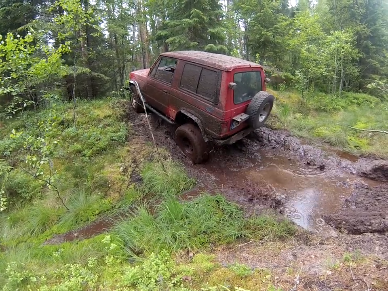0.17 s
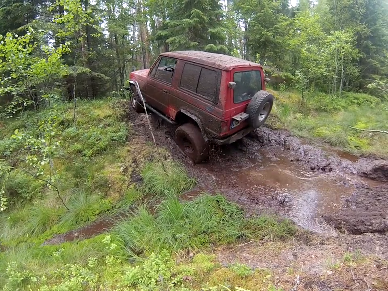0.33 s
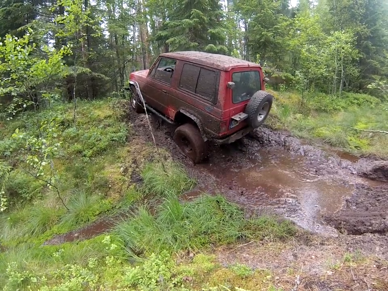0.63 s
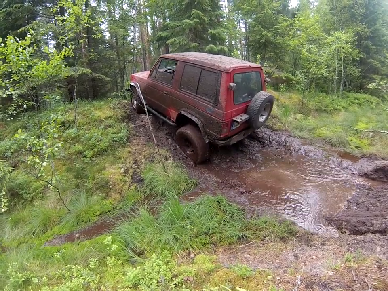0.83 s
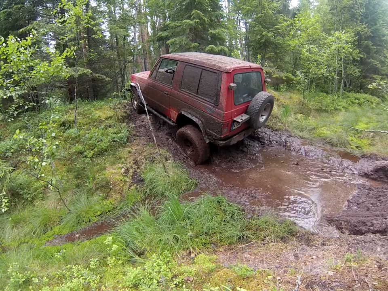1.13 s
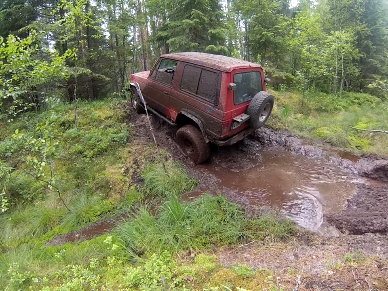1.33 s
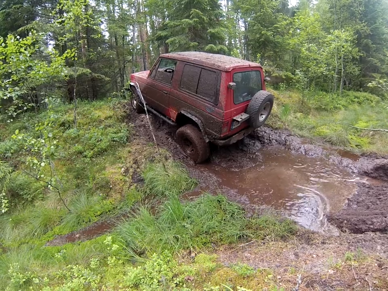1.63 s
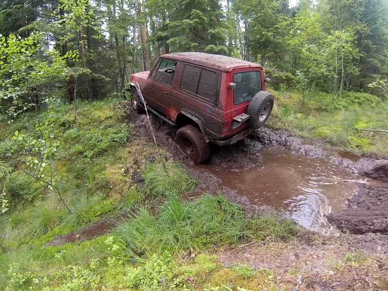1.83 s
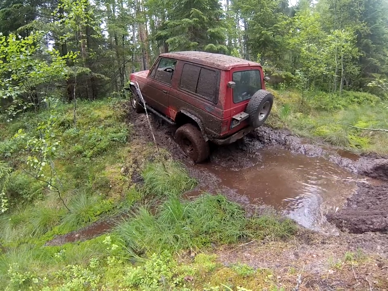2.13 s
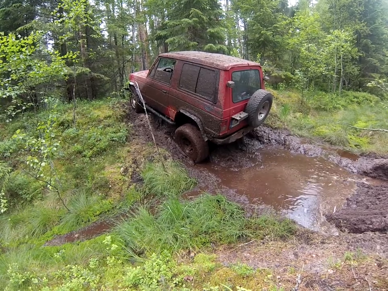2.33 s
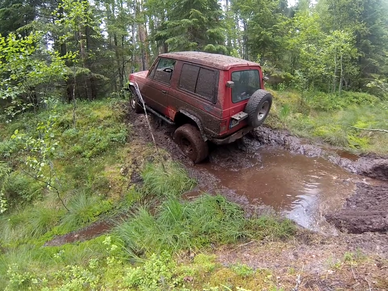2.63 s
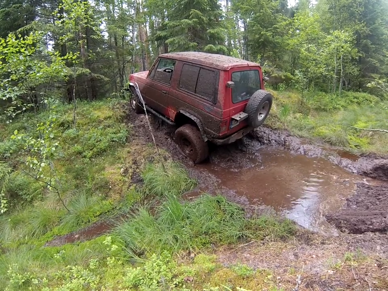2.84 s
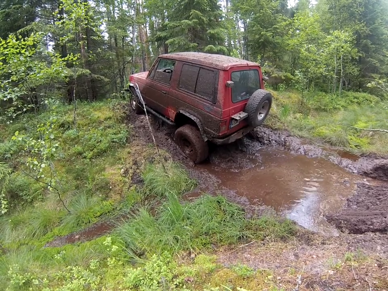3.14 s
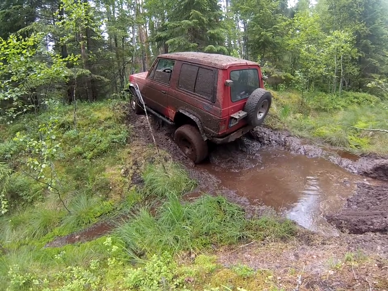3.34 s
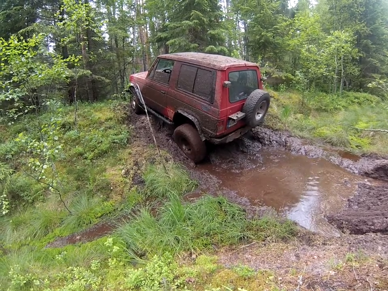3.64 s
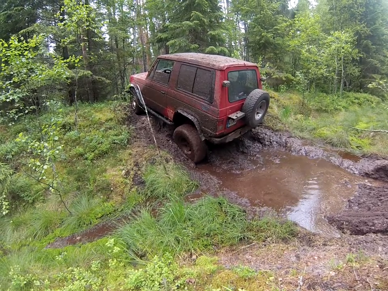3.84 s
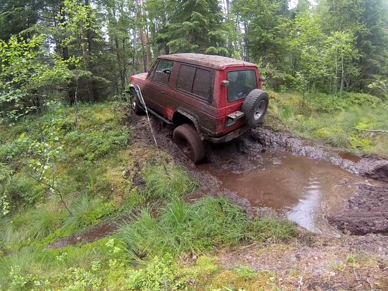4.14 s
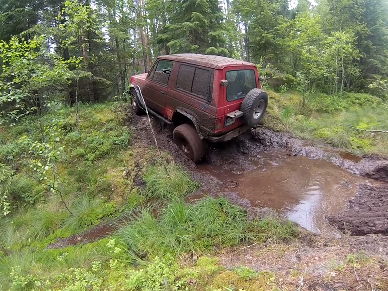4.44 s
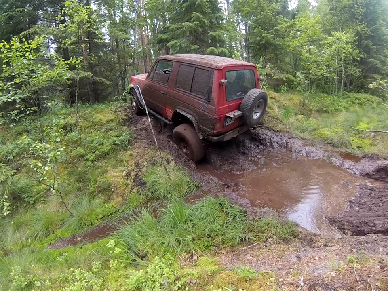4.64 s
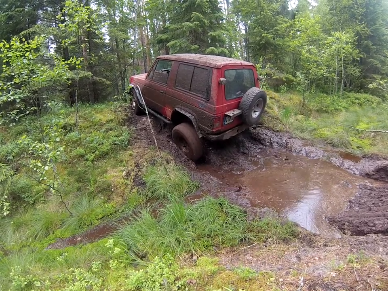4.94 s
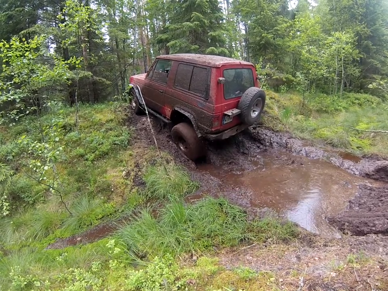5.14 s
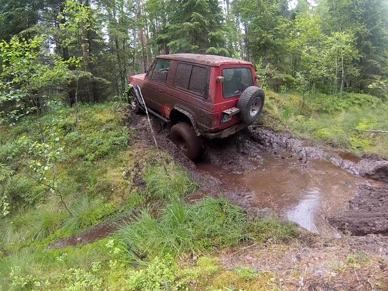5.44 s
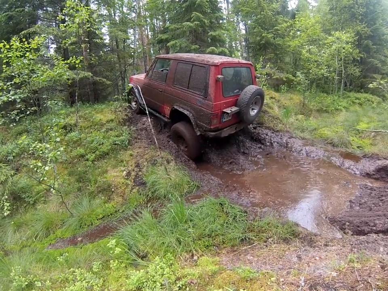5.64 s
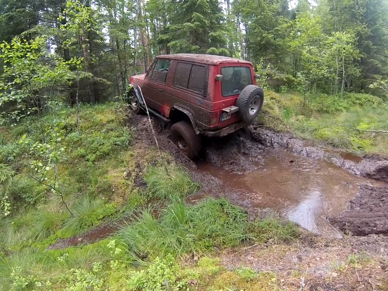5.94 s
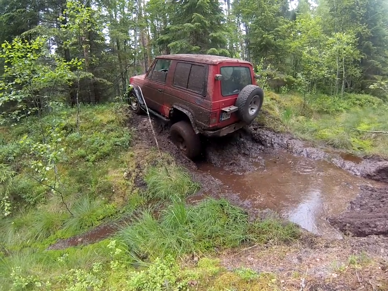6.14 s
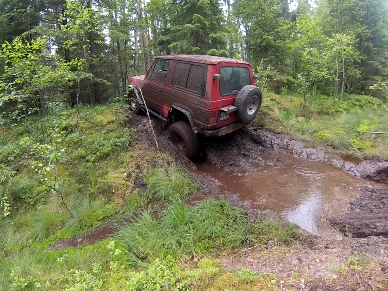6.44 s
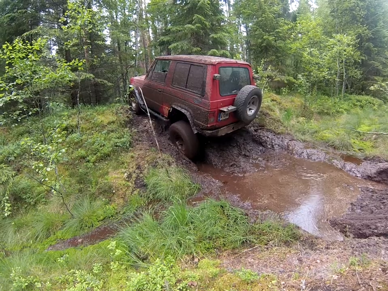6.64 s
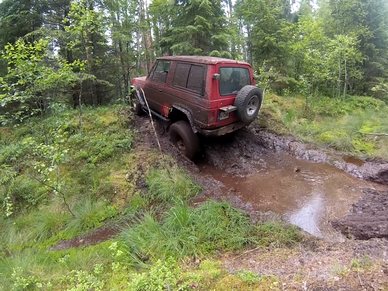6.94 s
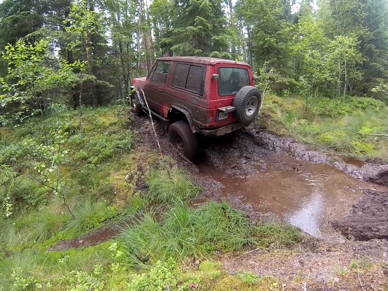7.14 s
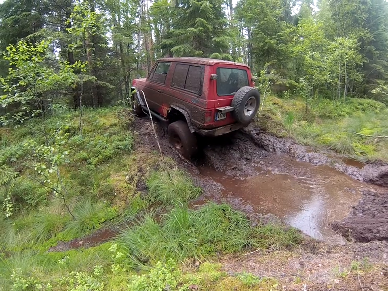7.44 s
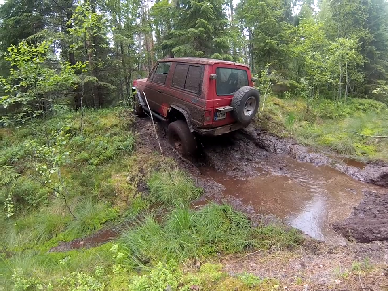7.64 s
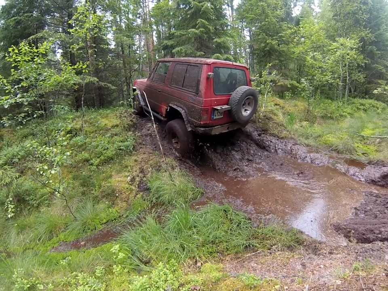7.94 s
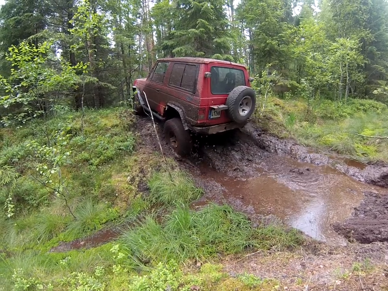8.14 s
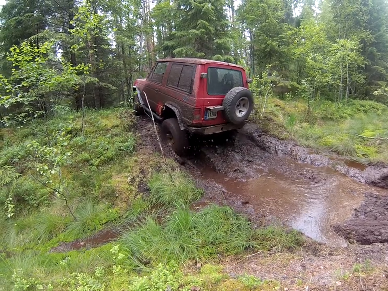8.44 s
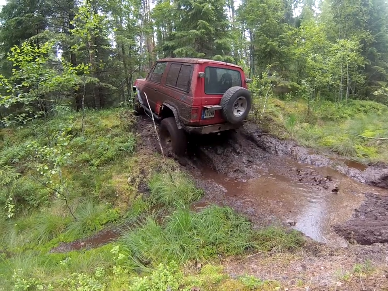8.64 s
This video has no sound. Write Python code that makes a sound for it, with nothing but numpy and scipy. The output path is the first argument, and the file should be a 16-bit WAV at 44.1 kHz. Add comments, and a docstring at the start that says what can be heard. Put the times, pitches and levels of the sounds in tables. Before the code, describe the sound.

A six-cylinder off-road vehicle strains up a muddy forest bank. Its raspy, hollow drone rises briefly, then drops into a slow throbbing idle while clods plop and a twig snaps. The throttle opens again for a long steady pull, eases with two sharp exhaust pops, then climbs to a loud, whistling peak. Mud squelches and spatters under slipping tyres. The microphone stands outdoors a short way behind, with faint breeze rumble.

```python
"""A light breeze rumbles on the microphone in a forest while a six-cylinder four-wheel drive labours up mud.
The engine pulls, then sinks to idle as a twig snaps and clods plop; it pulls again, and surges at the end.
Phase-locked sines make the drone of firing orders; gated noise through resonances makes rasp, jet and boom.
Narrow noise-fed modes whistle and sing; clicks setting resonators ringing make pops, mud and drops.
A twig's crack is a dying burst of coloured noise; the breeze is coloured noise with single puffs."""
import sys
import numpy as np
from scipy import signal
from scipy.fft import rfft, irfft, next_fast_len
from scipy.io import wavfile
from scipy.ndimage import uniform_filter1d, map_coordinates

SR = 44100
rng = np.random.default_rng(int(sys.argv[2]) if len(sys.argv) > 2 else 0)


def bounce(signal):
    """Save signal as a 16-bit WAV file at the path given by the first command-line argument."""
    frames = np.transpose(np.atleast_2d(signal))
    limited = np.clip(frames, -1, 1)
    pcm = np.round(limited * 32767).astype(np.int16)
    wavfile.write(sys.argv[1], SR, pcm)


N = 387192
TIME = np.arange(N) / SR

# Spectra of the breeze and the forest background: frequency_hz, relative_db_per_hz
BREEZE_SPECTRUM = [(12, 0.5), (25, -5.5), (45, -9), (75, -14.5), (120, -20), (200, -29), (330, -43),
                   (700, -53)]
FOREST_SPECTRUM = [(200, 3.5), (700, -4.5), (1500, -9), (2400, -10.5), (3500, -13.5), (6000, -15),
                   (10000, -18), (15000, -19)]
# Puffs of air on the microphone: centre_s, level_db
PUFFS = [(1.094, -32.5), (1.618, -36.5), (4.864, -36), (5.387, -37)]

# Clods of wet mud landing: start_s, level_db, pitch_hz
CLODS = [(1.411, -44, 720), (1.478, -46, 655), (6.766, -41, 660), (6.826, -38, 595)]
# Flung drops ticking on leaves and sticks: start_s, level_db, pitch_hz
DROPS = [(1.512, -45, 5700), (1.56, -48, 5700), (2.558, -50, 5700), (2.595, -43.5, 2300),
         (2.624, -43, 2300)]
# Tyres losing grip and digging in: peak_s, extra_churn_db
SLIPS = [(.4, 6.5), (6.8, 10.5)]
SLIP_BUILD_S, SLIP_GRIP_S = 0.34, 0.055   # half lengths before and after the peak
# Twigs breaking under the tyres: start_s, relative_db
TWIGS = [(1.181, -56), (2.021, -41), (2.036, -59)]
# Spectrum of a twig's crack: frequency_hz, relative_db_per_hz
WOOD_SPECTRUM = [(330, -4), (560, -6), (830, 5.5), (1100, -10), (1650, -9), (1950, -14), (2350, 1.5),
                 (3000, -17), (4700, -11), (8000, -23.5), (14000, -31)]

# Engine speed: time_s, firings_per_s
ENGINE_SPEED = [(0.0, 71.4), (0.18, 69.9), (0.31, 76.0), (0.42, 76.8), (0.76, 87.9), (0.81, 82.4),
                (0.91, 80.0), (1.1, 69.5), (1.54, 48.9), (1.95, 35.2), (2.58, 23.5), (2.83, 24.5),
                (2.92, 31.5), (3.06, 47.0), (3.16, 55.1), (3.3, 60.9), (3.52, 64.6), (3.86, 62.9),
                (4.06, 68.0), (4.3, 70.8), (4.86, 70.1), (5.0, 73.3), (5.22, 73.0), (5.45, 68.4),
                (5.56, 62.4), (5.8, 60.5), (6.02, 61.9), (6.59, 75.3), (6.76, 76.2), (7.0, 69.3),
                (7.14, 68.7), (7.68, 86.2), (8.1, 105.7), (8.34, 95.5), (8.48, 80.3), (8.78, 81.3)]
# Gas flow let through by the throttle: time_s, flow_db (above a steady pull)
GAS_FLOW = [(0, 0.5), (.4, 3.5), (.62, 2.5), (.72, -5.5), (1.4, -14.5), (2.8, -24), (2.98, -7), (3.32, -3),
            (3.46, -0.5), (4.2, 1), (5.2, 1), (5.6, 0), (6.7, 1.5), (6.96, -1), (7.25, 2), (7.95, 6),
            (8.11, 5), (8.24, -2.5), (8.52, -2.5), (8.64, 3), (8.78, 1.5)]
CRUISE_PER_S = 70   # firings per second of a steady pull
CYLINDERS = 6

# Level laws: steady_pull_db, db_per_db_of_flow, db_per_octave_of_engine_speed
NOTE_LAW = (-61.5, 1, 0.68)
RASP_LAW = (-55.5, 0.64, 0.61)
JET_LAW = (-55.5, 1.35, 0.28)
BOOM_LAW = (-55.5, 0.68, 3.5)
CHURN_LAW = (-65.5, 0.065, 7.4)

# Sharp pops in the exhaust: start_s, level_db
POPS = [(1.308, -35.5), (6.035, -24.5), (6.058, -27.5)]
POP_SPREAD_S, POP_RUMBLE_DB = 0.06, -7   # decay time of the rumble; its level against the pop

# Spectra of the rasp and the jet before the tailpipe: frequency_hz, relative_db_per_hz
RASP_SPECTRUM = [(150, 18.5), (330, -18.5), (420, -3.5), (760, -3), (1400, -5.5), (1900, -10.5), (3300, -9),
                 (4500, -14), (9000, -15)]
JET_SPECTRUM = [(1500, 1), (3300, -3), (4400, 1), (6000, 2.5), (7300, -5.5), (11000, -11.5), (15000, -17)]
# Resonances of the tailpipe: centre_hz, width_hz, gain_db
TAILPIPE_MODES = [(460, 13, 3), (607, 75, 10), (782, 25, -31.5), (864, 68, 4.5), (1577, 62, 6),
                  (1995, 130, -3.5), (2169, 170, 10.5), (2487, 550, 12.5), (3370, 99, -2), (3590, 79, 7.5),
                  (4720, 530, 5.5), (5773, 335, 12), (6180, 130, -3.5), (6770, 440, 6), (8650, 460, -6),
                  (10960, 590, 7.5)]
# Pipe modes that sing out while the engine pulls hard: peak_s, pitch_hz, level_db, half_length_s
SINGING_MODES = [(3.15, 2590, -67, 0.18), (3.13, 4830, -68, 0.17), (3.47, 1080, -60, 0.22),
                 (4.15, 1098, -59, 0.28), (4.65, 2190, -59, 0.6), (6.35, 2160, -55, 0.52),
                 (7.87, 470, -53, 0.08), (7.8, 2170, -55, 0.25), (7.95, 2240, -48, 0.05),
                 (8.04, 1045, -52, 0.1), (8.67, 2225, -58.5, 0.1), (8.68, 4760, -61, 0.1)]
SING_CYCLES = 68   # a singing mode rings for this many of its own cycles
# Narrow modes that a fast jet sets whistling: pitch_hz, relative_db, t60_s
WHISTLES = [(2930, -4, 0.024), (5250, -4, 0.024), (5345, 0, 0.036), (5860, -2, 0.018), (5975, 2, 0.042),
            (8130, 3.5, 0.004)]
WHISTLE_WANDER, WHISTLE_FLUTTER_DB = 0.004, 1.2   # spread of relative pitch; spread of level
# Throttle held wide open, so that the whistles leap out: start_s, end_s, extra_db
SURGES = [(0.05, 0.62, 5), (3.38, 5.35, 3), (7.04, 8.177, 7), (8.555, 8.805, 5.5)]
SURGE_RAMP_S, WHISTLE_DB = 0.09, -7.5   # whistles against the hiss at a steady pull

# Barks as the throttle snaps shut or open: peak_s, swell_db, half_length_s
BARKS = [(0.906, 10, 0.1), (1.303, 5.5, 0.22), (1.693, 7.5, 0.14), (2.855, 11.5, 0.056),
         (3.093, 1.5, 0.065), (8.276, 3, 0.12)]
NOTE_BARK_SHARE = 0.85   # share of a bark or strain that reaches the pipe's hollow note
STRAIN_ABOVE_PER_S, STRAIN_DB_PER_FIRING = 93.6, 0.52   # every order swells at high revs
# Multiples of the firing rate: steady_pull_db, db_per_db_of_flow, db_per_octave_per_s_of_pick_up
FIRING_ORDERS = [(-42, 1.13, 3), (-39.5, 0.49, 2.5), (-45.5, 0.62, 2), (-42, 0.57, 1.5), (-43, 1.1, -1.3),
                 (-47, 1.22, 3.3)]
FLYWHEEL_S = 0.28   # the load of picking up speed is spread over this time
IDLE_BELOW_PER_S, IDLE_DB_PER_FIRING = 44, 0.4   # towards idle the pulses soften
# How the silencer passes a firing order: frequency_hz, gain_db
SILENCER_RESPONSE = [(30, -14), (65, -14.5), (95, -12), (127, -5), (144, -8.5), (162, -3.5), (175, -2.5),
                     (190, 1), (218, -8.5), (250, -12.5), (290, -12.5), (316, -18.5), (345, -36),
                     (420, -25), (475, -20), (525, -33.5), (590, -22), (660, -23)]
# Spectrum of uneven combustion booming in the silencer: frequency_hz, relative_db_per_hz
BOOM_SPECTRUM = [(50, -31), (110, -15), (185, 19.5), (280, 14), (360, -0.5), (600, -30)]
# Ragged strokes setting the silencer burbling: peak_s, level_db, half_length_s
BURBLES = [(1.75, -56, .33), (4.7, -53, .5), (6.1, -45, .11)]
# Single firings thrumming in the silencer, while coasting and as the engine starts to pick up: peak_s,
# level_db, half_length_s
THRUMS = [(2.046, -58, 0.32), (2.882, -50, 0.07)]
# When coasting, the level rocks once per engine cycle
LOPE_DB, COASTING_FLOW_DB = 4, -20   # depth of rocking; flow at which coasting is complete
# Each firing is a soft, deep throb, strongest a little above idle
THROB_DB, THROB_PEAK_PER_S, THROB_DB_PER_FIRING = -47.5, 39, 0.4

CUTOFF_HZ = 15250


def from_db(db):
    """Logarithmic level: 20 dB is a tenfold amplitude."""
    return 10 ** (np.asarray(db) / 20)


def rms_one(x):
    """Normalisation: dividing by the root mean square leaves unit power."""
    return x / np.sqrt(np.mean(x ** 2) + 1e-20)


def curve(rows):
    """Linear interpolation: the value column of a (time, value) table at every sample."""
    times, values = np.transpose(rows)
    return np.interp(TIME, times, values)


def swell(peak_s, half_length_s):
    """Gaussian envelope: a smooth bump of height 1 around a moment."""
    return np.exp(-((TIME - peak_s) / half_length_s) ** 2)


def swells(rows):
    """Superposition: a gain curve summed from bumps of (peak_s, level_db, half_length_s)."""
    return sum(from_db(db) * swell(s, seconds) for s, db, seconds in rows)


def noise():
    """White noise: independent samples carry equal power at all frequencies."""
    return rng.standard_normal(N)


def colour(x, spectrum):
    """Spectral weighting: a gain curve over log frequency shapes x, which returns at unit power."""
    hz, db = np.transpose(spectrum)
    size = next_fast_len(N + SR // 2)
    bins_hz = np.fft.rfftfreq(size, 1 / SR) + 1
    # above the last point the spectrum drops by a further 31 dB
    gain_db = np.interp(np.log(bins_hz), np.log(hz), db, right=db[-1] - 31.0)
    return rms_one(irfft(rfft(x, size) * from_db(gain_db), size)[:N])


def drift(rate):
    """Low-passed white noise of spread 1: two equal real poles leave only slow chance variation."""
    step = 40   # samples between slow values
    pole = np.exp(-2 * np.pi * rate * step / SR)
    slow = signal.lfilter([1], [1, -2 * pole, pole * pole], rng.standard_normal(N // step + 2002))
    slow = slow[2000:]   # drop the settling of the filter
    return np.interp(np.arange(N) / step, np.arange(len(slow)), rms_one(slow))


def ring(x, hz, t60):
    """Damped resonance: a unit click starts a decaying sine, 60 dB down after t60 seconds."""
    radius, angle = np.exp(-np.log(1000) / (t60 * SR)), 2 * np.pi * hz / SR
    feedback = [1, -2 * radius * np.cos(angle), radius * radius]
    return signal.lfilter([0, np.sin(angle)], feedback, x + 1e-18)


def clicks(rows):
    """Impulse excitation: one single-sample click for each (start_s, level_db)."""
    out = np.zeros(N)
    for s, db in rows:
        out[int(s * SR)] = from_db(db)
    return out


def crumble(x, decay_s):
    """Energy-preserving dispersal: each click becomes a noise burst that dies exponentially."""
    t = TIME[:SR // 10]
    burst = rng.standard_normal(len(t)) * np.exp(-t / decay_s)
    return signal.fftconvolve(x, burst / np.linalg.norm(burst))[:N]


def grains(per_s, spread_db):
    """Clustered random arrivals: clicks of uneven size and random sign, coming in clumps."""
    born = rng.random(N) < per_s * from_db(4 * drift(5)) / SR
    size = from_db(spread_db * np.minimum(rng.exponential(1, N), 4))
    return born * size * rng.choice([-1, 1], N)


def level(law, rate):
    """Power-law scaling: a level in dB that follows gas flow and engine speed."""
    steady_db, per_flow, per_octave = law
    return steady_db + per_flow * curve(GAS_FLOW) + per_octave * np.log2(rate / CRUISE_PER_S)


def forest():
    """Diffuse background: steady noise with a sloping spectrum."""
    return from_db(-63.5) * colour(noise(), FOREST_SPECTRUM)


def side_noise():
    """Antiphase stereo: very faint noise of opposite sign in the two channels."""
    side = colour(noise(), [(200, -1.0), (5000, -9.5), (9000, 8.5), (15000, 0.5)])
    return from_db(-83.5) * side * np.array([[1], [-1]])


def breeze():
    """Turbulent pressure at the microphone: lumpy low rumble, with a few single puffs."""
    air = from_db(-46.0 + drift(4.3)) * colour(noise(), BREEZE_SPECTRUM)
    for s, db in PUFFS:
        t = TIME - s
        wave = np.sin(2 * np.pi * 24 * t) + 0.55 * np.sin(2 * np.pi * 62 * t)
        air = air + from_db(db) * swell(s, 0.026) * wave
    return air


def impacts(rows, burst_s, t60):
    """Impact resonance: each (start_s, level_db, pitch_hz) is a short burst that rings at its pitch."""
    return sum(ring(crumble(clicks([(s, db)]), burst_s), hz, t60) for s, db, hz in rows)


def squelch():
    """Bubble resonance: air pockets burst under the tread, each ringing at one of twelve pitches."""
    pockets = grains(per_s=300, spread_db=3.5)
    pitches = np.geomspace(480, 1000, 12)
    dealt = rng.integers(0, len(pitches), N)
    # higher pockets ring more weakly
    return rms_one(sum(ring(pockets * (dealt == k), hz, 9 / hz) / hz ** 2.1
                       for k, hz in enumerate(pitches)))


def spatter():
    """Granular impact noise: fine spatter ticks on the leaves."""
    ticks = crumble(grains(per_s=84, spread_db=3.0), decay_s=0.0037)
    return colour(ticks, [(1000, -1), (2500, -14), (6000, -12), (14000, -19.0)])


def mud(rate):
    """Granular excitation: tyres churn louder with engine speed and dig in as they slip; clods and drops land."""
    plops = impacts(CLODS, burst_s=0.009, t60=0.014)
    drops = impacts(DROPS, burst_s=0.006, t60=0.003)
    slip_db = sum(db * swell(s, np.where(TIME < s, SLIP_BUILD_S, SLIP_GRIP_S)) for s, db in SLIPS)
    churn_db = level(CHURN_LAW, rate) + slip_db
    return plops + drops + from_db(churn_db) * squelch() + from_db(0.64 * churn_db - 29.0) * spatter()


def twigs():
    """Brittle fracture: a sharp crack, then splintering fibres that die away."""
    hits = clicks(TWIGS)
    crack = crumble(hits, decay_s=0.0068)
    splinters = from_db(-14.0) * crumble(hits, decay_s=0.038)
    return from_db(21.5) * np.std(hits) * colour(crack + splinters, WOOD_SPECTRUM)


def pops():
    """Impulse response of the silencer: short thuds, each trailing a ragged rumble."""
    hits = clicks(POPS)
    hits = hits + from_db(POP_RUMBLE_DB) * crumble(hits, POP_SPREAD_S)
    return ring(hits, 235, 0.036) + from_db(-20) * ring(hits, 560, 0.02)


def gate(firings, sharpness, uneven_db, imbalance):
    """Periodic flow modulation: one gush per firing; the six cylinders differ, and so does every stroke."""
    stroke = firings.astype(int)
    cylinder_db = np.array([-4.5, 8.0, -1.0, 2.5, 4.5, 5.5])   # before scaling by the imbalance
    stroke_db = imbalance * cylinder_db[stroke % len(cylinder_db)]
    stroke_db = stroke_db + uneven_db * rng.standard_normal(N)[stroke]
    gush = np.exp(-sharpness * np.cos(2 * np.pi * firings))
    return rms_one(gush * from_db(stroke_db))


def buzz(firings, between_db):
    """Fourier synthesis: a pressure pattern repeating each crank turn of three firings, firing orders leading."""
    orders = np.arange(300)   # multiples of the crank's turning rate
    strength = from_db(np.where(orders % 3, between_db, 0)) * (orders > 18) / np.sqrt(orders + 1)
    turn = irfft(strength * np.exp(2j * np.pi * rng.random(len(orders))), 8192)
    return rms_one(np.interp(firings / 3 % 1, np.linspace(0, 1, len(turn)), turn))


def tailpipe(x):
    """Duct resonance: a chain of peaks and dips, one for each mode of the pipe."""
    for hz, width, db in TAILPIPE_MODES:
        a, half, c = from_db(db / 2), np.pi * width / SR, -2 * np.cos(2 * np.pi * hz / SR)
        x = signal.lfilter([1 + half * a, c, 1 - half * a], [1 + half / a, c, 1 - half / a], x)
    return rms_one(x)


def steady(tone):
    """Amplitude limiting: a singing mode limits its own swing, so that its level evens out."""
    power = uniform_filter1d(rms_one(tone) ** 2, SR // 100) + 1e-6
    return rms_one(tone / power ** 0.3)


def whistle(hz, t60):
    """Narrow resonance fed by turbulence: its pitch wanders and its strength flutters."""
    wander = np.cumsum(WHISTLE_WANDER * drift(3))   # samples of time shift
    tone = map_coordinates(ring(noise(), hz, t60), [np.arange(N) + wander], order=3, mode="reflect")
    return tone * from_db(WHISTLE_FLUTTER_DB * drift(9))


def whistles(jet_db):
    """Flow-excited tones: they grow faster than the hiss that feeds them, and leap out at full throttle."""
    tones = rms_one(sum(from_db(db) * whistle(hz, t60) for hz, db, t60 in WHISTLES))
    surge_db = sum(db * np.clip(np.minimum(TIME - start, end - TIME) / SURGE_RAMP_S, 0, 1)
                   for start, end, db in SURGES)
    return tones * from_db(jet_db + WHISTLE_DB + 0.3 * curve(GAS_FLOW) + surge_db)


def singing(flow):
    """Selective resonance: single pipe modes pick their pitch out of the flow and sing for a while."""
    total = 0
    for s, hz, db, seconds in SINGING_MODES:
        t60 = SING_CYCLES / hz
        tone = steady(ring(ring(flow, hz, t60), hz, t60 / 2))
        total = total + from_db(db) * swell(s, seconds) * tone
    return total


def effort_db(rate):
    """Load dependence: extra push in the exhaust from strain at high revs and from single barks."""
    strain_db = STRAIN_DB_PER_FIRING * np.maximum(rate - STRAIN_ABOVE_PER_S, 0)
    return strain_db + sum(db * swell(s, seconds) for s, db, seconds in BARKS)


def rush(firings, rate):
    """Turbulent and pulsed excitation of a pipe: rasp and hollow notes, with a hissing, whistling jet on top."""
    note_db, rasp_db, jet_db = (level(law, rate) for law in (NOTE_LAW, RASP_LAW, JET_LAW))
    # the pulses stand out of the turbulence as the engine speeds up
    pulses = from_db(-11.5 + 0.14 * (rate - np.mean(rate))) * buzz(firings, between_db=-9)
    gushes = noise() * gate(firings, sharpness=0.2, uneven_db=1.1, imbalance=0.45)
    flow = colour(pulses + gushes, RASP_SPECTRUM)
    rasp = from_db(rasp_db) * tailpipe(flow)
    hollow = steady(ring(ring(flow, 1071.5, 0.042), 1080, 0.024))
    note = from_db(note_db + NOTE_BARK_SHARE * effort_db(rate)) * hollow
    # a lower mode howls only near the top of the rev range
    howl_db = note_db + 2.0 + 0.28 * (rate - np.max(rate))
    howl = from_db(howl_db) * rms_one(ring(ring(flow, 858.4, 0.041), 889, 0.036))
    stream = pulses + noise() * gate(firings, sharpness=0.075, uneven_db=0.67, imbalance=0.18)
    jet = from_db(jet_db + 0.96 * drift(16)) * tailpipe(colour(stream, JET_SPECTRUM))
    # the firings chop the note, singing and whistles into beads
    chop = gate(firings, sharpness=0.2, uneven_db=1.3, imbalance=0)
    pipe = rasp + howl + (note + singing(flow)) * chop
    return pipe * from_db(1.1 * drift(12)) + jet + chop * whistles(jet_db)


def orders_db(rate):
    """Forced response: orders grow with flow and pick-up, and swell gliding through silencer resonances."""
    hz, passed_db = np.transpose(SILENCER_RESPONSE)
    flow_db, push_db = curve(GAS_FLOW), effort_db(rate)
    octaves_per_s = np.gradient(np.log2(curve(ENGINE_SPEED))) * SR
    pick_up = uniform_filter1d(np.maximum(octaves_per_s, 0), int(FLYWHEEL_S * SR))
    soft_db = IDLE_DB_PER_FIRING * np.maximum(IDLE_BELOW_PER_S - rate, 0)
    levels = []
    for order, (db, per_flow, per_pick_up) in enumerate(FIRING_ORDERS, 1):
        silencer_db = np.interp(np.log(order * rate), np.log(hz), passed_db)
        levels.append(db + per_flow * flow_db + per_pick_up * pick_up + push_db - soft_db + silencer_db)
    return levels


def drone(firings, rate):
    """Harmonic series of the firing rate: clean low orders over boom, burble, thrum and a coasting throb."""
    coasting = np.clip(curve(GAS_FLOW) / COASTING_FLOW_DB, 0, 1)
    lines = 0
    for order, gain in enumerate(from_db(orders_db(rate)), 1):
        waver = from_db(0.7 * drift(20))
        sine = np.sin(2 * np.pi * (order * firings + rng.random()))
        lines = lines + np.sqrt(2) * gain * waver * sine
    lope = from_db(LOPE_DB * coasting * np.sin(2 * np.pi * firings / CYLINDERS))
    gushes = noise() * gate(firings, sharpness=0.62, uneven_db=1.5, imbalance=0.47)
    boom = from_db(level(BOOM_LAW, rate)) * colour(gushes, BOOM_SPECTRUM)
    burble = swells(BURBLES) * rms_one(ring(ring(gushes, 192, 0.097), 207, 0.029))
    thumps = np.diff(np.floor(firings), prepend=0)   # one click per firing
    thrum = swells(THRUMS) * steady(ring(ring(thumps, 190, 0.04), 158, 0.025))
    throb_db = THROB_DB - THROB_DB_PER_FIRING * np.abs(rate - THROB_PEAK_PER_S)
    throb_wave = sum(np.sin(2 * np.pi * order * firings) / order for order in range(1, 4))
    throb = from_db(throb_db) * coasting ** 2 * throb_wave
    return (lines + throb) * lope + boom + burble + thrum


def scene():
    """Superposition of sources: all stand straight ahead, and only the very faint side noise has width."""
    rate = curve(ENGINE_SPEED) * (1 + 0.003243 * drift(12.52))   # firings per second, slightly unsteady
    firings = np.cumsum(rate) / SR   # running count of firings
    vehicle = mud(rate) + twigs() + pops() + rush(firings, rate) + drone(firings, rate)
    return forest() + breeze() + vehicle + side_noise()


def record(dry):
    """Band limiting: a steep elliptic low-pass cuts the top."""
    return signal.sosfilt(signal.ellip(12, 0.1, 80, CUTOFF_HZ, fs=SR, output="sos"), dry)


dry = scene()
out = record(dry)
bounce(out)
```